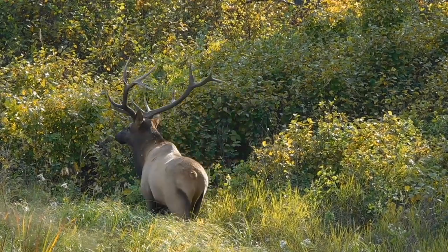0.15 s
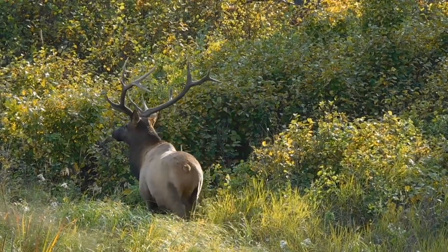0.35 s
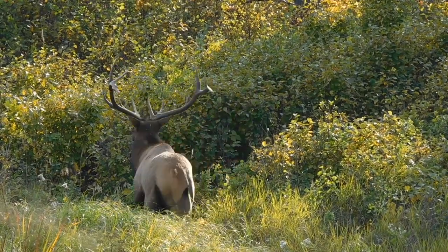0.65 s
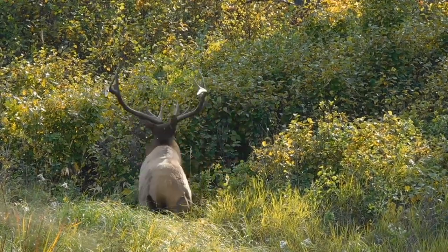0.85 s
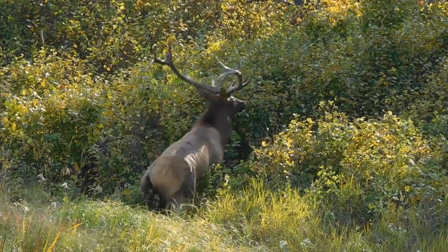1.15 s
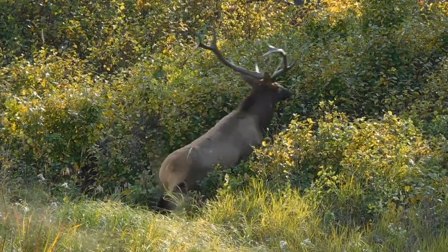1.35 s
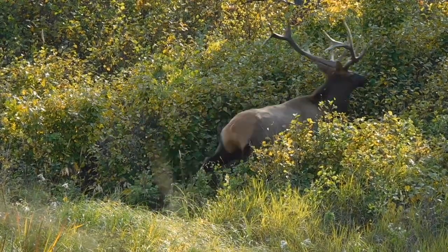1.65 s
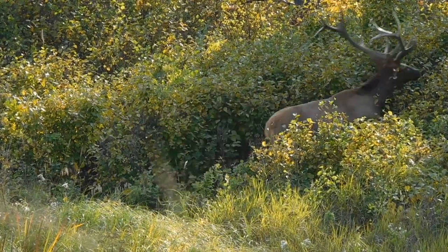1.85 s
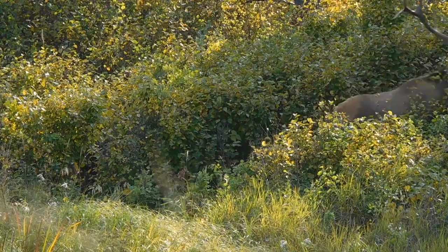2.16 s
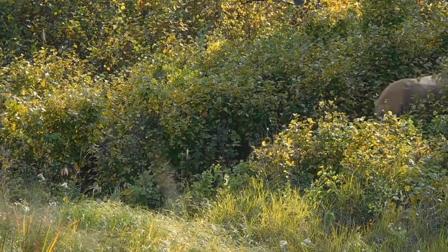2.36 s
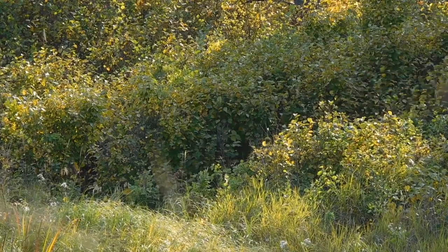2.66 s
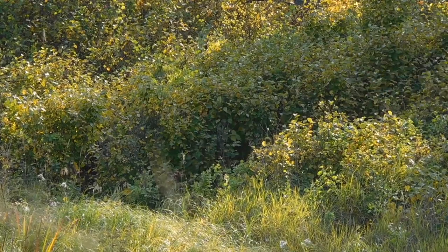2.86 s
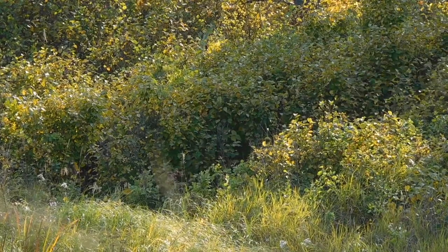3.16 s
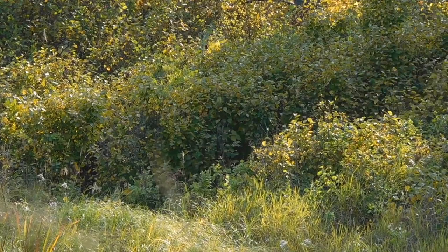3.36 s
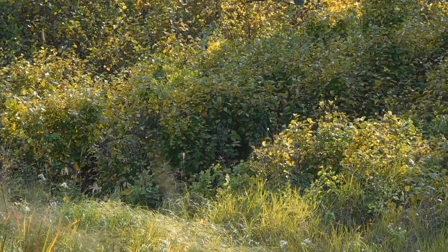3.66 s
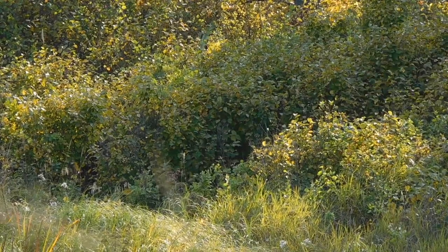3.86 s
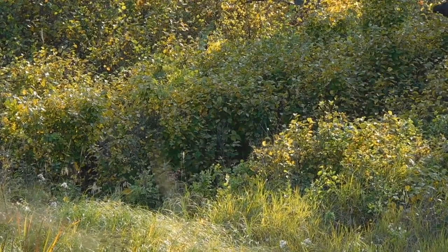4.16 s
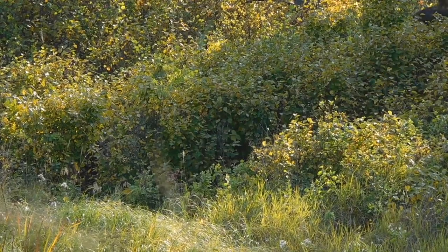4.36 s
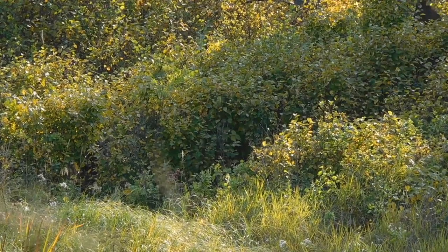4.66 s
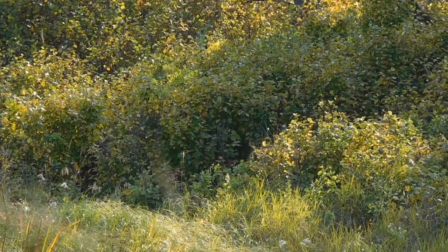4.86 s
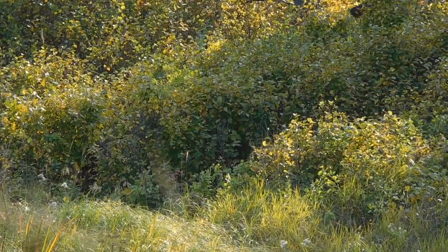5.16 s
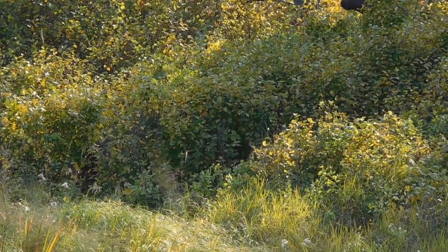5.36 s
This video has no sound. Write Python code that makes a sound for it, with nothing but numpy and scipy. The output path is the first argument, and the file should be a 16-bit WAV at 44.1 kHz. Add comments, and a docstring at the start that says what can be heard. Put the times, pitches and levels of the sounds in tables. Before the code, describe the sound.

On a brushy hillside an elk gives three short whistled calls that slide downward. The first begins at once, with a tiny chirp and a half-second glide; two sharper, louder ones follow, far apart, each breaking abruptly to a lower note. Leaves scatter a faint tail. A soft distant rush, slight low wind and recorder hiss lie beneath, with a tiny far twig snap near the end. Stereo microphone, calls near centre.

```python
"""Elk calls on a brushy hillside

Three short calls whistle cleanly and slide down; the last two break to a lower, louder register halfway.
Each is a few wavering harmonics plus breath noise, shaped by throat peaks and notches; brush scatters it.
Beneath: one far twig snap as a filtered click, and shaped noise for the low rumble, the far steady rush,
a little wind on the microphone ports and the recorder's own hiss."""
import sys
import numpy as np
from scipy import signal
from scipy.fft import rfft, irfft
from scipy.io import wavfile
from scipy.ndimage import uniform_filter1d

SR = 44100
rng = np.random.default_rng(int(sys.argv[2]) if len(sys.argv) > 2 else 0)


def transcribe(signal):
    """Save signal, clipped to [-1, 1], as a 16-bit WAV file at the path in sys.argv[1]."""
    frames = np.atleast_2d(signal).T
    limited = np.clip(frames, -1, 1)
    pcm = np.round(limited * 32767).astype(np.int16)
    wavfile.write(sys.argv[1], SR, pcm)


N = 243023

# High whistles, one table per call, each opening with a short chirp: (time [s], pitch [Hz], effort [dB])
WHISTLES = [
    [(0.101, 2250, -87), (0.105, 2300, -41.5), (0.109, 2163, -70), (0.116, 2200, -44), (0.122, 2050, -52),
     (0.126, 2040, -45), (0.15, 2023, -39), (0.175, 1980, -34.5), (0.19, 1940, -37), (0.24, 1891, -34.5),
     (0.26, 1811, -32), (0.28, 1676, -36), (0.3, 1550, -34.5), (0.32, 1349, -33.5), (0.34, 1205, -32),
     (0.38, 1101, -31), (0.415, 936.5, -35), (0.46, 805.5, -29), (0.503, 730.6, -34), (0.512, 717, -39),
     (0.525, 691, -35), (0.58, 626, -39.5), (0.61, 533, -49.5)],
    [(2.266, 2730, -75), (2.27, 2740, -34), (2.282, 2538, -24.5), (2.286, 2200, -42), (2.292, 1968, -36),
     (2.311, 1788, -36.5), (2.337, 1594, -33), (2.352, 1505, -26.5), (2.357, 1440, -33.5)],
    [(3.942, 2160, -68), (3.947, 2340, -30.5), (3.952, 2010, -41.5), (3.958, 1940, -35.5),
     (3.975, 1726, -39.5), (3.996, 1615, -30), (4.004, 1572, -31), (4.009, 1570, -31)],
]
# Harmonic lift of each whistle: (second harmonic [dB], third and higher [dB])
WHISTLE_LIFT = [(0, 0), (0.5, 1), (0.5, 9)]
# Low sinking notes, two loud ones after the break and two faint endings:
# (start [s], length [s], first pitch [Hz], initial fall [octaves/s], effort at the knee [dB],
#  second harmonic lift [dB], third and higher lift [dB], fade under the knee [dB/octave])
FALLS = [(0.612, 0.081, 517, .9, -54.5, 0, 1, 0.5), (2.354, 0.094, 1186, 12.2, -24.5, -1, -0.5, 18),
         (2.449, 0.021, 574, 9.4, -54.5, 9, 10, 1), (4.007, 0.0896, 1250, 12.6, -22.5, 1, 1.5, 19)]
KNEE_HZ = 1060   # pitch of the strongest effort
RISE_DB_PER_OCTAVE = 8.5   # above the knee the effort is still growing
SLOWING_PER_S = 0.798   # the fall rate, averaged since the start, drops by this share a second
ATTACK_S, ATTACK_DB, RELEASE_DB_PER_S = 0.003, 19, 2500

# Harmonics against the fundamental, by and large richer at low pitch:
# (pitch [Hz], second harmonic [dB], third harmonic [dB])
RICHNESS = [(515, -4, 3), (610, -1.5, -8.5), (650, -1.5, -14), (750, -3, -10), (906, -10, -14.5),
            (1190, -5.5, -18.5), (1340, -3, -35), (1550, -14.5, -22), (1615, -11.5, -21.5),
            (1830, -14, -32), (2050, -8.5, -31), (2250, -32, -40), (2600, -28.5, -41)]
FIRST_RICHNESS = [(494, -3, 2.5), (544, -16, -3.5), (610, -24, -12), (676, -9.5, -15), (862, -5.5, -16),
                  (1110, -8.5, -10.5), (1184, -5.5, -22), (1250, -6, -35), (1550, -14.5, -26),
                  (1814, -21, -38), (2050, -2, -22), (2200, -17, -30), (2300, -21, -30)]   # same columns, first call
# Fourth to eighth harmonic against the third, one value each: (level [dB])
HIGHER_HARMONICS = [-13.5, -38, -30.5, -36, -35]
FIRST_HIGHER_HARMONICS = [-14.5, -33, -24.5, -28, -28]   # same layout, first call
# Throat peaks (over 0 dB) and notches (under 0 dB): (frequency [Hz], width [Hz], gain [dB])
THROAT = [(1535, 60, -8), (1793, 87, 8.5), (1926, 30, -16.5), (2200, 220, 9), (2440, 73, 3.5),
          (3720, 320, 3.5), (3770, 280, 8.5), (4250, 100, 8)]
FIRST_THROAT = [(1538, 76, -5.5), (1980, 61, -1.5), (2450, 190, 5), (2890, 130, -7), (3160, 140, 6.5),
                (3270, 260, -6), (3867, 190, 7), (4450, 190, 8.5), (4120, 220, -1.5)]   # same columns, first call with the head held otherwise
HEAD_TURNS_S, THROAT_TOP_HZ = 1.5, 4450
FLUTTER_DB = 2.2   # base depth; grows with harmonic number
BREATH_DB, LOUD_DB = -21.5, -20.5   # breath before throat and effort; effort of a loud call
BREATH_GROWTH = 0.77   # dB the breath gains on the tone per dB of effort
AIRY_DB, AIRY_POWER = -59, 0.8   # treble hiss before its high-pass at full effort; growth with effort

BRUSH_DB, BRUSH_T60_S, BRUSH_GAP_S = -14, 0.35, 0.0065
RIGHT_LAG_S = 4.5e-5

# Twig snaps: (time [s], click level before filtering [dB])
TWIG = [(4.7869, -19)]
# Rumble swelling and fading, before the left-right tilt: (time [s], level [dB])
HUM = [(0, -80), (2.2, -71), (2.7, -67), (3.3, -61), (3.8, -69.5), (4.3, -68.5), (4.7, -70), (5.51, -69)]
# Spectrum of the far rush: (frequency [Hz], relative density [dB])
RUSH = [(53, -60), (90, -12), (123, -22.5), (228, -4), (353, -2), (394, -0.5), (423, -0.5), (745, 0),
        (1050, -0.5), (3380, -16.5), (7000, -35), (9100, -55), (15400, -120)]
RUSH_DB = -53.5
# How alike left and right are in the rush: (frequency [Hz], correlation [0-1])
RUSH_LIKENESS = [(100, 0.39), (500, 0.79), (1500, 0.82), (4000, 0.41), (7000, .05)]
WIND_DB, WIND_HZ, WIND_LIKENESS = -60, 19.8, 0.62   # middle level, upper corner, correlation
# Spectrum of the recorder hiss: (frequency [Hz], relative density [dB])
HISS = [(2350, 0), (4000, -3.5), (7070, -9.5), (14600, -9), (15600, -9.5)]
HISS_DB, CUTOFF_HZ = -69, 16050   # level before the top cut; edge of its stopband


def calls():
    """A tense membrane swings almost like a sine; its few harmonics pass fixed throat peaks and notches."""
    t = np.arange(N) / SR
    voice, effort = np.full(N, 1e-18), np.zeros(N)
    breath = signal.lfilter([1, 0, -1], [1, -1.2, .5], rng.standard_normal(N)) / 2
    breath = from_db(BREATH_DB) * breath
    waver = 1 + 0.0041 * drift(54)
    flutter = [drift(87) for k in range(8)]   # each harmonic wavers on its own

    notes = [(*np.transpose(rows), lifts) for rows, lifts in zip(WHISTLES, WHISTLE_LIFT)]
    notes += [fall(*row) for row in FALLS]
    for times, pitch_hz, effort_db, lifts_db in notes:
        on = (t >= times[0]) & (t <= times[-1])
        pitch_hz = np.interp(t[on], times, pitch_hz)
        effort_db = np.interp(t[on], times, effort_db)
        first_call = times[0] < HEAD_TURNS_S
        rich_hz, *rich_db = np.transpose(FIRST_RICHNESS if first_call else RICHNESS)
        second_db, third_db = [np.interp(pitch_hz, rich_hz, c) + lift
                               for c, lift in zip(rich_db, lifts_db)]
        higher_db = FIRST_HIGHER_HARMONICS if first_call else HIGHER_HARMONICS
        levels_db = [0, second_db, third_db] + [third_db + db for db in higher_db]

        phase = 2 * np.pi * np.cumsum(pitch_hz * waver[on]) / SR
        tone = 0
        for k, db in enumerate(levels_db):
            flutter_db = FLUTTER_DB * np.sqrt(k + 0.17) * flutter[k][on]
            tone = tone + from_db(db + flutter_db) * np.cos((k + 1) * phase)
        breath_gain = from_db(BREATH_GROWTH * (effort_db - LOUD_DB))
        voice[on] += np.sqrt(2) * from_db(effort_db) * (tone + breath[on] * breath_gain)
        effort[on] += from_db(effort_db)

    parts = np.split(voice, [round(HEAD_TURNS_S * SR)])
    for k, throat in enumerate([FIRST_THROAT, THROAT]):
        for hz, width_hz, db in throat:
            parts[k] = peak(parts[k], hz, width_hz, db)
    throat_top = signal.butter(5, THROAT_TOP_HZ, fs=SR, output="sos")
    return signal.sosfilt(throat_top, np.concatenate(parts)), effort


def fall(start, length, first_hz, octaves_per_s, db, second_db, higher_db, fade_db):
    """A note whose pitch sinks ever more slowly: quick attack, effort following pitch, quick release."""
    t = np.arange(0, length + .012, .001)
    pitch_hz = first_hz * 2 ** (-octaves_per_s * t * (1 - SLOWING_PER_S * t))
    octaves_over_knee = np.log2(pitch_hz / KNEE_HZ)
    effort_db = db - ATTACK_DB * np.maximum(1 - t / ATTACK_S, 0)
    effort_db = effort_db - fade_db * np.maximum(-octaves_over_knee, 0)
    effort_db = effort_db - RISE_DB_PER_OCTAVE * np.maximum(octaves_over_knee, 0)
    effort_db = effort_db - RELEASE_DB_PER_S * np.maximum(t - length, 0)
    return start + t, pitch_hz, effort_db, (second_db, higher_db)


def airy(effort):
    """A thin treble hiss swells with the effort of each call, unalike in the two channels."""
    treble = signal.butter(2, 5500, "high", fs=SR, output="sos")
    hiss = signal.sosfilt(treble, rng.standard_normal((2, N)))
    swell = np.abs(uniform_filter1d(effort / effort.max(), size=600)) ** AIRY_POWER
    return from_db(AIRY_DB) * hiss * swell


def ports(voice):
    """The sound reaches the left port a little before the right; a phase ramp makes the lag."""
    lag = np.exp(-2j * np.pi * np.fft.rfftfreq(N, 1 / SR) * RIGHT_LAG_S)
    return np.array([voice, irfft(rfft(voice) * lag, N)])


def brush(voice):
    """Many weak reflections from leaves and stems, dying away; partly shared by the two channels."""
    t = np.arange(SR // 2) / SR
    common, *own = rng.standard_normal((3, len(t)))
    decay = from_db(-60 * t / BRUSH_T60_S) * (t > BRUSH_GAP_S)
    echoes = rms_one((common + 0.54 * np.array(own)) * decay) / np.sqrt(len(t))
    # the throat beams its strongest band forward, less of it reaches the brush
    voice = peak(voice, 2250, 350, -5)
    return from_db(BRUSH_DB) * signal.fftconvolve(voice[None], echoes, axes=1)[:, :N]


def twig():
    """A far twig snaps: one click, dulled by distance with a band-pass."""
    clicks = np.full(N, 1e-18)
    for s, db in TWIG:
        clicks[round(s * SR)] = from_db(db)
    return signal.sosfilt(signal.butter(3, [700, 3000], "band", fs=SR, output="sos"), clicks)


def hum():
    """A low rumble of band-passed noise, partly shared by the channels and stronger on the right."""
    band = signal.butter(2, [120, 320], "band", fs=SR, output="sos")
    mid, *own = signal.sosfilt(band, rng.standard_normal((3, N)))
    level_db = np.interp(np.arange(N) / SR, *np.transpose(HUM))
    return from_db(level_db) * rms_one(mid + .5 * np.array(own)) * from_db([[-1.5], [1.5]])


def rush():
    """A far steady rush: broad noise, strongest in the low mids, with small level drifts in each slice."""
    return from_db(RUSH_DB) * stereo_noise(RUSH, RUSH_LIKENESS, patchy_db=0.94)


def wind():
    """Lumpy pressure on the microphone ports: noise falling off above about 20 Hz, its level wandering."""
    band = signal.butter(1, [4, WIND_HZ], "band", fs=SR, output="sos")
    mid, side = signal.sosfilt(band, rng.standard_normal((2, N)))
    pair = stereo_pair(mid, side, WIND_LIKENESS)
    pair = signal.sosfilt(signal.butter(2, 300, fs=SR, output="sos"), pair)
    level_db = WIND_DB + 2.0 * drift(3.1) + np.array([[-.4], [.4]])
    return from_db(level_db) * rms_one(pair)


def from_db(db):
    """Decibels to gain."""
    return 10 ** (np.asarray(db) / 20)


def rms_one(x):
    """Scale to rms 1."""
    return x / np.sqrt(np.mean(x ** 2) + 1e-20)


def at_hz(points, hz):
    """Read a curve on a log-frequency axis."""
    points_hz, values = np.array(points).T
    return np.interp(np.log(hz), np.log(points_hz), values)


def drift(rate_hz):
    """Random wander of spread 1: noise twice through a one-pole low-pass, on every 40th sample."""
    r = np.exp(-80 * np.pi * rate_hz / SR)
    noise = rng.standard_normal(N // 40 + 2002)
    slow = signal.lfilter([1], [1, -2 * r, r * r], noise)[2000:]   # skip the filter's start
    return np.interp(np.arange(N) / 40, np.arange(len(slow)), rms_one(slow))


def peak(x, hz, width_hz, db):
    """A resonance (dB over 0) or a notch (under 0) on a flat response."""
    w, g = 2 * np.pi * hz / SR, from_db(db / 2)
    a = np.pi * width_hz / SR
    return signal.lfilter([1 + a * g, -2 * np.cos(w), 1 - a * g],
                          [1 + a / g, -2 * np.cos(w), 1 - a / g], x)


def stereo_pair(mid, side, alike):
    """Mix independent noises into left and right with the given correlation."""
    return np.sqrt(1 + alike) * mid + np.sqrt(1 - alike) * side * np.array([[1], [-1]])


def stereo_noise(spectrum, likeness, patchy_db):
    """Two-channel noise in third-octave slices, each with its own likeness and level drift; rms 1."""
    hz = np.maximum(np.fft.rfftfreq(N, 1 / SR), 1)
    inside = (hz > spectrum[0][0]) & (hz < spectrum[-1][0] * 1.1)
    shape = from_db(at_hz(spectrum, hz)) * inside
    mid, side = rfft(rng.standard_normal((2, N))) * shape
    pair = stereo_pair(mid, side, np.clip(at_hz(likeness, hz), -1, 1))
    third = np.floor(3 * np.log2(hz))
    noise = 0
    for k in np.unique(third[inside]):
        noise = noise + irfft(pair * (third == k), N) * from_db(patchy_db * drift(1.53))
    return rms_one(noise)


def scene():
    """Calls with their scatter and treble hiss, over the twig, the rumble, the far rush and the wind."""
    voice, effort = calls()
    return ports(voice) + brush(voice) + airy(effort) + twig() + hum() + rush() + wind()


def record(dry):
    """Each channel adds its own nearly independent hiss; a steep low-pass cuts the top."""
    hiss = from_db(HISS_DB) * stereo_noise(HISS, [(4000, 0.008), (15000, 0)], patchy_db=-0.46)
    top_cut = signal.cheby2(24, 60, CUTOFF_HZ, fs=SR, output="sos")
    return signal.sosfilt(top_cut, dry + hiss)


dry = scene()
out = record(dry)
transcribe(out)
```